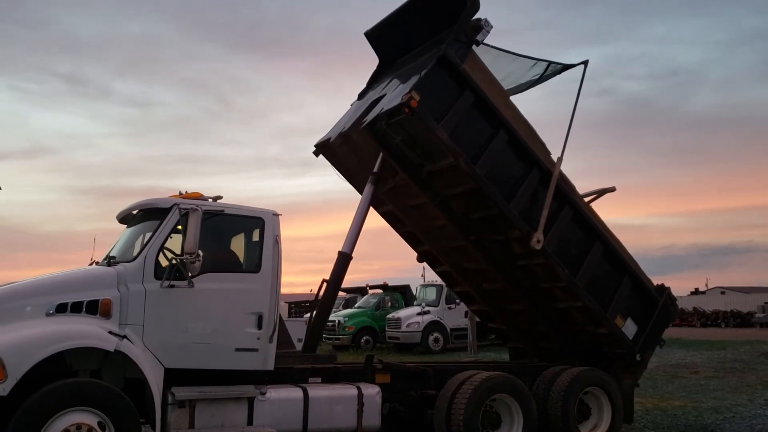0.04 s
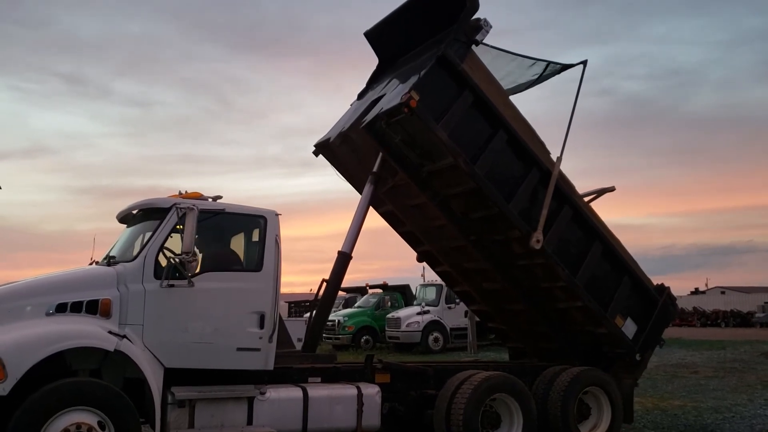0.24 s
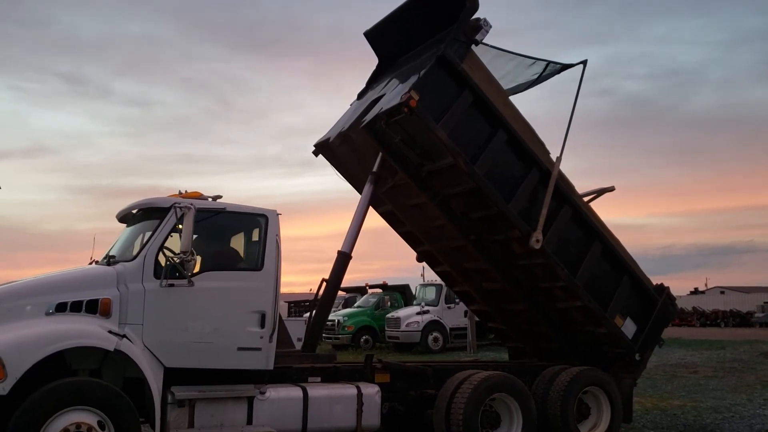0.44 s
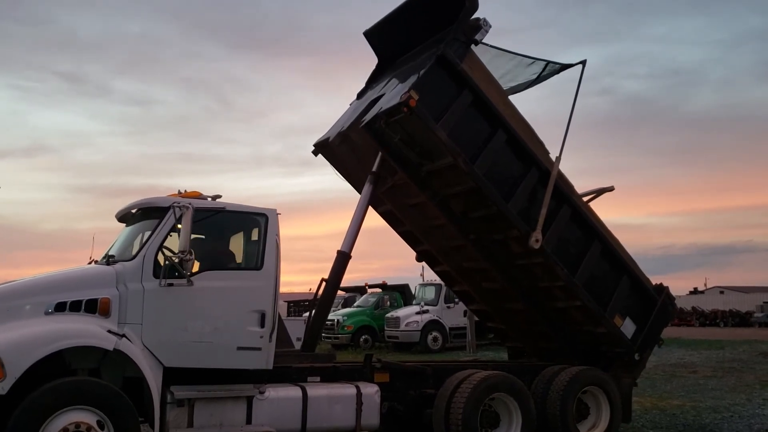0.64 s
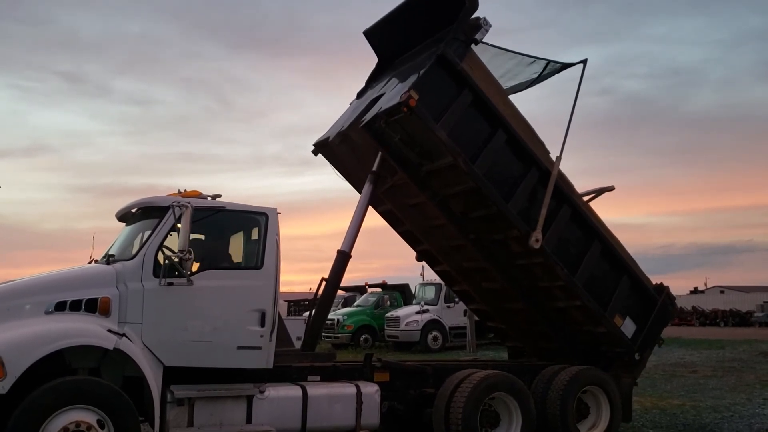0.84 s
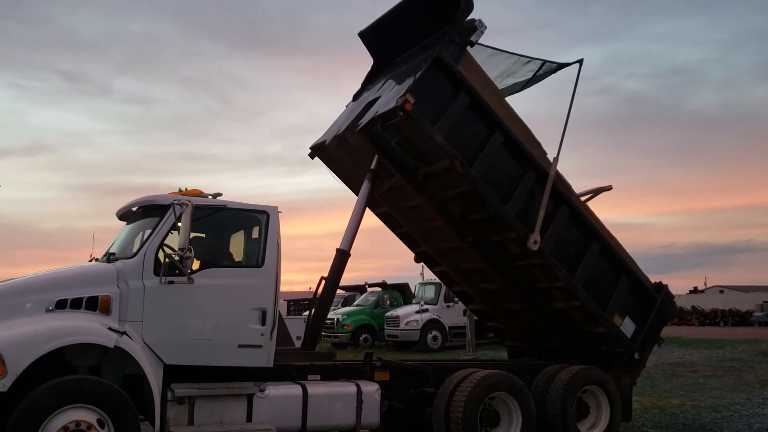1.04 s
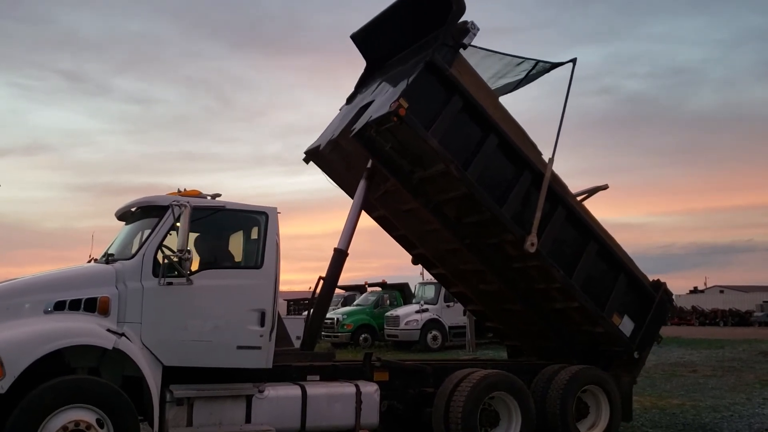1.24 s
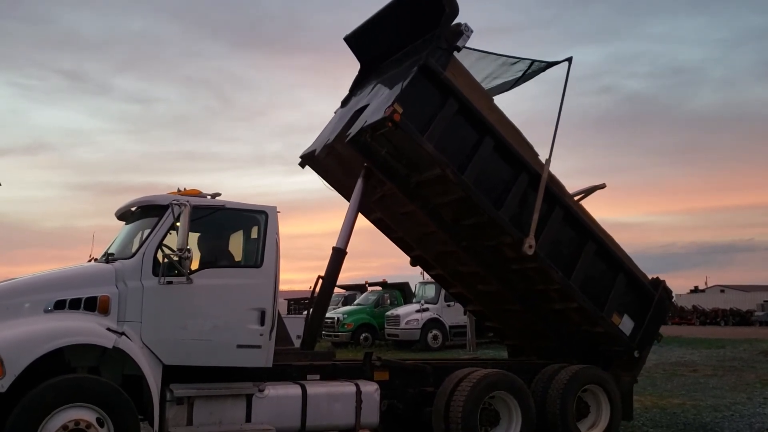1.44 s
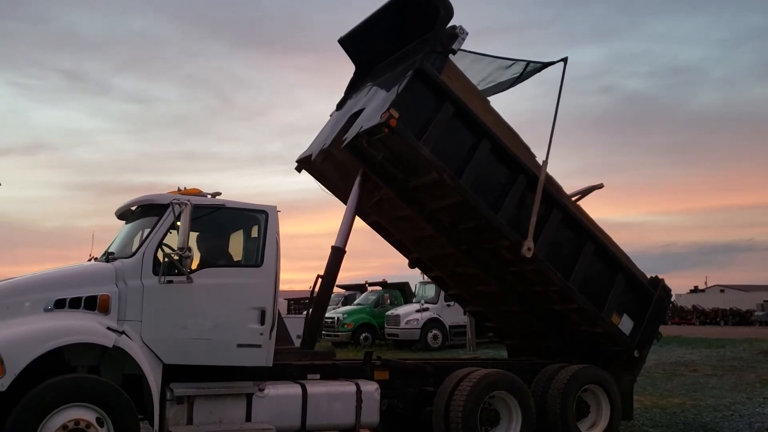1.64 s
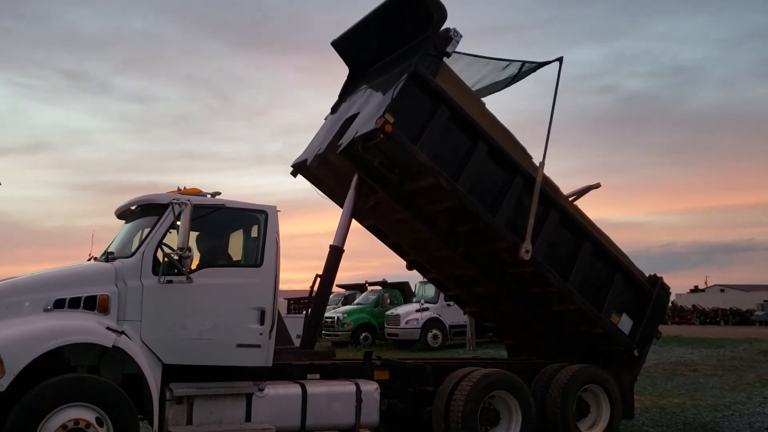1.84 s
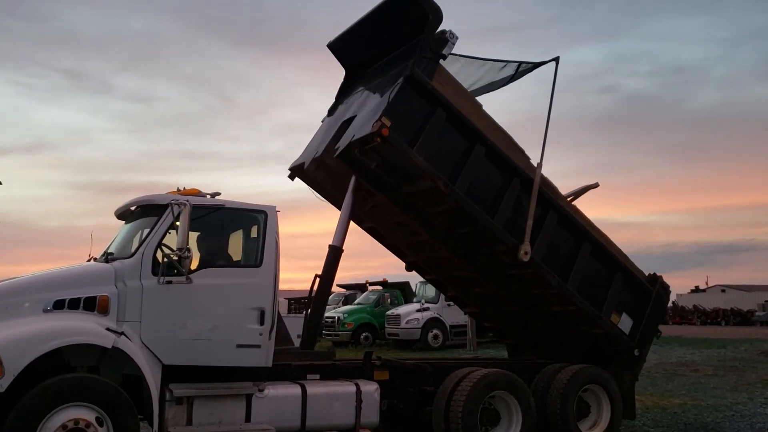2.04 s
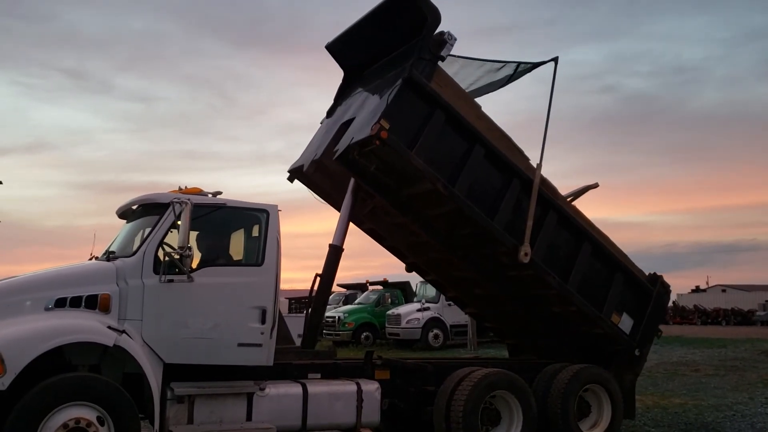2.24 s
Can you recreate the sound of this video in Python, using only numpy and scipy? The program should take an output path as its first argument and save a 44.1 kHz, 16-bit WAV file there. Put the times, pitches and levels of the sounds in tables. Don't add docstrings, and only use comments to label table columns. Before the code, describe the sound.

A dump truck's diesel engine idles roughly outdoors, then its steel bed bangs and clanks heavily

```python
import sys
import numpy as np
from scipy import signal
from scipy.fft import rfft, irfft, next_fast_len
from scipy.io import wavfile
from scipy.ndimage import uniform_filter1d

SR = 44100
rng = np.random.default_rng(int(sys.argv[2]) if len(sys.argv) > 2 else 0)


def persist_wave(psi):
    counts = np.round(np.clip(psi, -1, 1) * 32767).astype(np.int16)
    wavfile.write(sys.argv[1], SR, np.atleast_2d(counts).T)


def magnitude_from_level(level_db):
    exponent = np.asarray(level_db, float) / 20
    return 10 ** exponent


N = 101429

TURN_HZ, FIRST_TURN_S = 11.67, 0.027
FIRE_HZ = 3 * TURN_HZ


def evened(x):
    return x / np.sqrt(np.mean(x ** 2) + 1e-20)


def read(points, hz):
    f, value = np.transpose(points)
    return np.interp(np.log(hz + 1), np.log(f + 1), value)


def curve(points):
    s, value = np.transpose(points)
    return np.interp(np.arange(N) / SR, s, value)


def colour(x, points):
    size = next_fast_len(x.shape[-1])
    hz = np.fft.rfftfreq(size, 1 / SR)
    octaves_below = np.maximum(np.log2(points[0][0] / (hz + 1)), 0)
    octaves_above = np.maximum(np.log2((hz + 1) / points[-1][0]), 0)
    gain = magnitude_from_level(read(points, hz) - 24 * (octaves_below + octaves_above))
    return irfft(rfft(x, size) * gain, size)[..., :x.shape[-1]]


def band_pass(x, low_hz, high_hz):
    return signal.sosfilt(signal.butter(2, [low_hz, high_hz], "bandpass", fs=SR, output="sos"), x)


def wander(rate_hz):
    size = next_fast_len(N)
    hz = np.fft.rfftfreq(size, 1 / SR)
    slow = (hz > 0) / (1 + (hz / rate_hz) ** 4)
    return evened(irfft(rfft(rng.standard_normal(size)) * slow, size)[:N])


def ring(modes, seconds=0.5):
    t = np.arange(0, seconds, 1 / SR)
    return sum(magnitude_from_level(db - 60 * t / t60) * np.sin(2 * np.pi * hz * t) for hz, db, t60 in modes)


def ports(near, other):
    # (frequency [Hz], share from 0 to 1)
    likeness = [(60, 0.96), (300, 0.96), (550, 0.53), (950, 0.27), (1500, 0.15), (3000, 0.62), (6000, 0.39),
                (12000, 0.067)]
    # (frequency [Hz], difference [dB])
    lean = [(60, -1), (240, 1), (950, 1), (3770, 3.5), (15000, 1)]
    lead_s = 0.00012
    size = next_fast_len(N)
    hz = np.fft.rfftfreq(size, 1 / SR)
    same = np.clip(read(likeness, hz), 0, 1)
    left = rfft(near, size)
    delayed = left * np.exp(-2j * np.pi * hz * lead_s)
    right = same * delayed + np.sqrt(1 - same ** 2) * rfft(other, size)
    tilt = magnitude_from_level(read(lean, hz) / 2)
    return irfft(np.array([left * tilt, right / tilt]), size)[:, :N]


def firing_blows():
    cylinder_db = [1, -1.5, 2.9, 4, 0.4, -1]
    decay_s = 0.012
    fires = (np.arange(N) / SR - FIRST_TURN_S) * FIRE_HZ
    which = np.floor(fires).astype(int)
    uneven_db = 0.77 * rng.standard_normal(100)[which + 5]
    strength = magnitude_from_level(np.array(cylinder_db)[which % 6] + uneven_db)
    return strength * np.exp(-(fires % 1) / (FIRE_HZ * decay_s))


def engine():
    # (frequency [Hz], density [dB per Hz])
    block = [(18, -62), (30, -30), (51, -14.5), (70, -25.5), (110, -10), (202, -18), (510, -17.5),
             (561, -16.5), (962, -15), (3000, -35.5), (3900, -33.5), (6600, -120)]
    # (frequency [Hz], density [dB per Hz])
    fan = [(1180, -4), (2000, -3), (2380, -4.5), (2820, -8), (4230, -8), (5430, -18), (8350, -30),
           (12400, -27), (15700, -46)]
    # (frequency [Hz], width [Hz], level [dB])
    panels = [(588.5, 13, -2), (695, 21, -29), (860, 65, 6.5), (987, 32, -6), (1190, 76, -15),
              (1650, 220, 9)]
    # (time [s], level [dB])
    load = [
        (0, -0.5),
        (.3, -0.5),
        (.65, -1),
        (1.0, 0),
        (1.3, -1.16),
        (1.6, -1),
        (2.3, 2),
    ]
    roar_db, hiss_db, clatter_db = -32, -39.5, -40.5
    fire_depth = 0.14
    blow = firing_blows()
    throb = 1 - fire_depth + fire_depth * evened(blow)
    swell = curve(load) + 0.39 * wander(24.0)
    a, b, c = rng.standard_normal((3, 2, N))
    roar = magnitude_from_level(roar_db + swell) * evened(colour(a * throb, block))
    hiss = magnitude_from_level(hiss_db + 0.73 * swell) * evened(colour(b * throb ** 0.8, fan))
    panel_ring = ring([(hz, db, 3.3 / width) for hz, width, db in panels], 0.2)
    rattle = signal.oaconvolve(c * blow, panel_ring[None])[:, :N]
    clatter = magnitude_from_level(clatter_db + swell + 0.87 * wander(6.4)) * evened(rattle)
    return ports(*(roar + hiss + clatter + valve_tick()))


def valve_tick():
    strength_db = [-5, -7, -6, 0, -1, 0.5, -18, -1.5, -1.5, -4, -3, -4, -2.5, -8, -2.5, -2.5, -6.5, 2,
                   -23.5, 10, -16, -6, -3, -11, -11, 1, -3]
    # (frequency [Hz], level [dB], time to fade by 60 dB [s])
    metal = [(3825, 3.5, 0.018), (4256, 5, 0.018), (4300, -4, 0.025)]
    level_db, early_s, decay_s = -14.5, 0.0056, 0.0043
    since = (np.arange(N) / SR - FIRST_TURN_S + early_s) * TURN_HZ
    turn = np.clip(np.floor(since).astype(int), 0, len(strength_db) - 1)
    rise = np.minimum(since % 1 * 20, 1)
    decay = np.exp(-(since % 1) / (TURN_HZ * decay_s))
    noise = colour(rng.standard_normal((2, N)), [(3500, 0), (4800, 0.0033)])
    strike = noise * magnitude_from_level(np.array(strength_db)[turn]) * decay * rise
    tick = signal.oaconvolve(strike, ring(metal, 0.05)[None])[:, :N]
    return magnitude_from_level(level_db) * tick / np.sqrt(np.mean(ring(metal, 0.071) ** 2) * 0.034 * SR * 40)


def exhaust():
    # (time [s], pitch [Hz], level [dB])
    surges = [(0.0, 63.6, -66), (0.06, 67.9, -63), (0.25, 69.8, -28.5), (0.31, 67.5, -60),
              (0.36, 69.14, -32), (0.71, 69.56, -38), (0.76, 70.6, -27), (0.88, 69, -43.5),
              (1.0, 69.6, -29.5), (1.34, 69.3, -39.5), (1.42, 69.24, -29), (1.71, 68.6, -42.5),
              (1.77, 70.9, -22.5), (1.82, 75, -43), (2.01, 72.3, -26), (2.08, 69.2, -36), (2.21, 70, -28),
              (2.3, 72.4, -51)]
    # (multiple of crank speed, level [dB])
    orders = [(3, -56), (5, -44), (8, -42), (10, -47.5)]
    turns = np.cumsum(TURN_HZ * (1 + 0.0062 * wander(2.4))) / SR
    s, hz, boom_db = np.transpose(surges)
    pipe = np.cumsum(curve(np.c_[s, hz])) / SR
    out = np.sqrt(2) * magnitude_from_level(curve(np.c_[s, boom_db])) * np.sin(2 * np.pi * pipe)
    for k, db in orders:
        tone = np.sin(2 * np.pi * (k * turns + rng.random()))
        out = out + np.sqrt(2) * magnitude_from_level(db + 3.9 * wander(13.0)) * tone
    boom = out + low_bumps()
    return ports(boom, np.roll(boom, 150))


def low_bumps():
    # (time [s], peak level [dB], pitch [Hz])
    bumps = [(0.019, -43, 224), (0.076, -30, 136), (0.137, -35, 126), (0.186, -32, 96.9), (0.244, -19, 99),
             (0.371, -27, 96.9), (0.512, -20.5, 107.5), (1.006, -25, 94), (1.193, -26, 118),
             (1.35, -21, 99), (1.406, -18, 98), (1.468, -23.5, 127), (1.5, -27, 144), (1.577, -21, 187)]
    trim_db, rise_s = -8, 0.01
    out, t = np.zeros(N), np.arange(0, 0.1, 1 / SR)
    for s, db, hz in bumps:
        swell = t / rise_s * np.exp(1 - t / rise_s)
        tone = np.sin(2 * np.pi * hz * t) + 0.27 * np.sin(2 * np.pi * 1.7 * hz * t)
        out[round(s * SR):][:len(t)] += magnitude_from_level(db + trim_db) * swell * tone
    return out


def bed():
    left_db, lead_s = 2.5, 0.00005
    yard_db, yard_t60_s = -9.5, 0.52
    high_pass = signal.butter(3, 83, "highpass", fs=SR, output="sos")
    out = signal.sosfilt(high_pass, knocks() + tolls())
    t = np.arange(SR // 2) / SR
    late = np.clip(t / 0.013 - 1, 0, 1)
    tail = rng.standard_normal((2, len(t))) * magnitude_from_level(-60 * t / yard_t60_s) * late
    wet = signal.fftconvolve(out[None, :N], tail / np.linalg.norm(tail[0]), axes=1)[:, :N]
    lag = np.exp(-2j * np.pi * np.fft.rfftfreq(N, 1 / SR) * lead_s)
    left = out[:N] * magnitude_from_level(left_db / 2)
    right = irfft(rfft(out[:N]) * lag, N) / magnitude_from_level(left_db / 2)
    return np.array([left, right]) + magnitude_from_level(yard_db) * (wet + 0.077 * wet[::-1]) / 1.56


def knocks():
    # (time [s], level [dB], rattle length [s], clang level [dB], plate struck)
    blows = [(1.572, -35, 0.032, -32, "side"), (1.6, -49, 0.007, -31, "side"),
             (1.646, -21.5, 0.017, -14, "latch"), (1.658, -20, 0.028, -9.5, "floor"),
             (1.708, -29, 0.011, -31, "beam"), (1.757, -30.5, 0.018, -24, "side"),
             (1.804, -24, 0.014, -24, "side"), (1.813, -17, 0.019, -23, "side"),
             (1.831, -26, 0.011, -21, "side"), (1.865, -33.5, 0.021, -31, "side"),
             (1.905, -36, 0.009, -26, "gate"), (1.942, -24.5, 0.016, -25, "gate"),
             (1.946, -18, 0.011, -8, "gate"), (1.954, -17, 0.012, -14, "gate"),
             (1.98, -24.5, 0.015, -12, "side"), (2.0, -36, 0.014, -24, "side"),
             (2.049, -39, 0.004, -33.5, "gate"), (2.087, -31.5, 0.0095, -22, "side")]
    # (frequency [Hz], density [dB per Hz])
    scrape = [(350, -42), (600, 6.5), (1630, -15), (1830, -12), (3020, -25), (4520, -13), (8300, -23.5),
              (12500, -29)]
    clang_t60_s = 0.089
    dull_hz, bright_hz = 4400, 15000
    plates = plate_modes()
    out, t = np.zeros(N + SR), np.arange(0, 0.3, 1 / SR)
    for s, db, length, clang_db, plate in blows:
        noise = rng.standard_normal((2, len(t)))
        shove = noise[0] * np.clip(t / 0.0053, 0, 1) ** 2 * np.clip(1.3 - t / length, 0, 1)
        fade = magnitude_from_level(clang_db - 60 * np.maximum(t - length / 2, 0) / clang_t60_s)
        clang = evened(colour(noise[1], scrape)) * np.clip(t / 0.0021, 0, 1) * fade
        knock = 0.5 * struck(plates[plate], shove) + clang + thud(noise[1, ::-1], length)
        top_hz = dull_hz if plate == "gate" else bright_hz
        knock = signal.sosfilt(signal.butter(3, top_hz, fs=SR, output="sos"), knock)
        out[round(s * SR):][:len(t)] += magnitude_from_level(db) * knock
    return out


def plate_modes():
    # (frequency [Hz], level [dB], time to fade by 60 dB [s])
    floor = [(127, -2.5, 0.14), (172, 0, 0.11), (221, -14, 0.35), (291, -3, 0.36), (387, 2.5, 0.26),
             (460, -7, 0.29), (640, 1, 0.093), (773, -7.5, 0.19), (870, -4.5, 0.078), (1005, -9, 0.15),
             (1297, -5.5, 0.14), (1480, -38, 0.12), (2096, -24, 0.19)]
    side = [(126.4, -5.5, 0.43), (176.3, -6, 0.27), (202, -11, 0.058), (315.6, -3.5, 0.99), (380, -6, 0.23),
            (444, -14.5, 0.71), (613, -4, 0.42), (736, -9.5, 0.43), (778, -26, 0.5), (1027, -18, 0.09),
            (1335, -35, 0.25), (1754, -16.5, 0.044), (2325, -14.5, 0.094), (3990, -20, 0.029)]
    gate = [(96.8, -2, 0.13), (120.3, -11, 0.27), (218, 1.5, 0.053), (260, -4.5, 0.058), (410, -7.5, 0.2),
            (533, -20, 0.21), (668, -6.5, 0.13), (810, -10, 0.24), (895, -14, 0.099), (1055, -6, 0.11),
            (1347, -13, 0.18), (1522, -11.5, 0.32), (1870, -27, 0.52), (2250, -56, 0.26)]
    latch = [(389, 4.5, 0.24), (544, -14, 0.15)]
    beam = [(274, 9.5, 0.11), (455, -6, .12)]
    return dict(floor=floor, side=side, gate=gate, latch=latch, beam=beam)


def struck(modes, shove):
    spread = 0.07
    t, out = np.arange(len(shove)) / SR, 0
    for (hz, db, t60), chance in zip(modes, rng.standard_normal((14, 8, 1))):
        shift = spread * min(hz / 600, 2) * chance * np.sqrt(np.arange(8))[:, None] / 2
        crowd = np.sin(2 * np.pi * hz * (1 + shift) * t).sum(0)
        part = signal.fftconvolve(shove, crowd * magnitude_from_level(-60 * t / t60))[:len(t)]
        out = out + magnitude_from_level(db) * part / np.sqrt(np.mean(part[:round(0.05 * SR)] ** 2))
    return out


def thud(noise, length):
    # (frequency [Hz], level [dB], time to fade by 60 dB [s])
    wash = [(130, -12, 0.19), (248, -9, 0.27), (465, -5, 0.36), (750, -5.5, 0.29), (1190, -8.5, 0.11),
            (1880, -25, 0.09)]
    rise_s = 0.01
    t, out = np.arange(len(noise)) / SR, 0
    for hz, db, t60 in wash:
        band = evened(band_pass(noise, hz / 1.266, hz * 1.152))
        out = out + band * magnitude_from_level(db - 60 * np.maximum(t - length, 0) / t60)
    return out * np.clip(t / rise_s, 0, 1)


def tolls():
    # (time [s], peak level [dB], pitch [Hz], time to fade by 60 dB [s])
    swings = [(1.645, -16.5, 380.5, 0.31), (1.666, -10.5, 213.4, 0.23), (1.705, -21, 287.7, 0.17),
              (1.76, -21.5, 304, 0.13), (1.815, -15, 217.5, 0.26), (1.9, -24.5, 262, 0.11),
              (1.948, -5.5, 261.4, 0.11), (2.046, -24, 263, 0.086), (2.082, -24, 222, 0.11),
              (1.813, -28, 3990, 0.068), (1.822, -24.5, 750, 0.15), (1.956, -15, 848, 0.08),
              (1.96, -24, 410, .2), (1.985, -34, 3990, 0.07)]
    rise_s = 0.012
    out, t = np.zeros(N + SR), np.arange(0, 0.3, 1 / SR)
    for s, db, hz, t60 in swings:
        rise = np.tanh(t / rise_s * np.sqrt(hz / 250)) ** 2
        out[round(s * SR):][:len(t)] += magnitude_from_level(db - 60 * t / t60) * rise * 2 * np.sin(2 * np.pi * hz * t)
    return out


def spits():
    # (time [s], peak level [dB], centre frequency [Hz])
    bursts = [(.052, -56, 6000), (.16, -57, 12000), (.25, -59, 12000), (.27, -61, 10800),
              (.532, -61, 12000), (.705, -53, 5600), (.753, -56, 5800), (1.17, -58, 12000),
              (1.186, -61, 5600), (1.34, -59, 12000), (1.366, -63, 12000), (1.57, -56.5, 7130),
              (1.62, -56, 11900), (1.775, -57, 7300), (1.88, -55, 12200), (2.202, -56, 6950)]
    rise_s, spread = 0.007, 1.06
    out, t = np.zeros((2, N + SR)), np.arange(0, 0.06, 1 / SR)
    for s, db, hz in bursts:
        hiss = evened(band_pass(rng.standard_normal((2, len(t))), hz / spread, hz * spread))
        swell = t / rise_s * np.exp(1 - t / rise_s)
        out[:, round((s - rise_s / 2) * SR):][:, :len(t)] += magnitude_from_level(db) * hiss * swell
    return out[:, :N]


def leak():
    leak_hz, leak_db, flutter_db = 12000, -68, 5.5
    level = magnitude_from_level(leak_db + flutter_db * np.tanh(wander(25.0)))
    return level * evened(band_pass(rng.standard_normal((2, N)), leak_hz * 0.9, leak_hz * 1.21))


def wind():
    # (time [s], level [dB])
    gusts = [(0, -44), (.3, -34.5), (.5, -48), (.65, -51), (1.05, -40.5), (1.17, -61.5), (1.22, -32.5),
             (1.3, -38), (1.75, -29), (1.87, -21), (1.92, -27.5), (2.3, -33.5)]
    wind_hz, lump_db = 105, 1.5
    sides = []
    for port in range(2):
        lumpy = rng.standard_normal(N) * magnitude_from_level(lump_db * wander(59.0))
        sides.append(evened(band_pass(lumpy, wind_hz / 3.2, wind_hz * 1.87)))
    return np.array(sides) * magnitude_from_level(curve(gusts))


def scene():
    return engine() + exhaust() + bed() + spits() + leak() + wind()


def top_cut(x):
    return signal.sosfilt(signal.butter(12, 15810, fs=SR, output="sos"), x)


def record(dry):
    limit_db, squeeze, creep_db_per_s = -20, 0.54, -5.5
    hiss_db, edge_hz = -59.5, 15700
    power_db = 10 * np.log10(abs(uniform_filter1d((dry ** 2).mean(0), 1300)) + 1e-12)
    fall = np.arange(N) * creep_db_per_s / SR
    held_db = np.maximum.accumulate(power_db + fall) - fall
    over_db = np.maximum(held_db - limit_db, 0)
    hiss = magnitude_from_level(hiss_db) * np.diff(rng.standard_normal((2, N + 1)), axis=1) / 2
    out = dry / magnitude_from_level(squeeze * uniform_filter1d(over_db, 900)) + hiss
    low_pass = signal.firwin(511, edge_hz, window=("kaiser", 9), fs=SR)
    out = signal.oaconvolve(out, low_pass[None], "same")
    return top_cut(out)


dry = scene()
out = record(dry)
persist_wave(out)
```